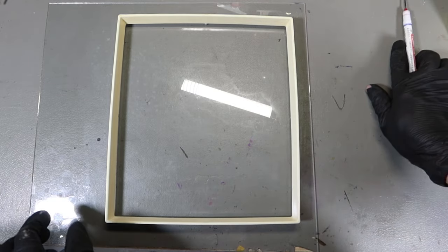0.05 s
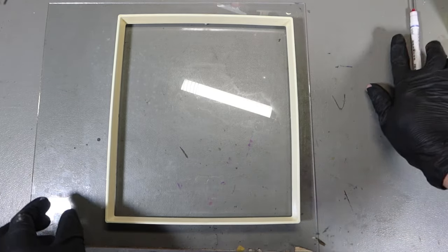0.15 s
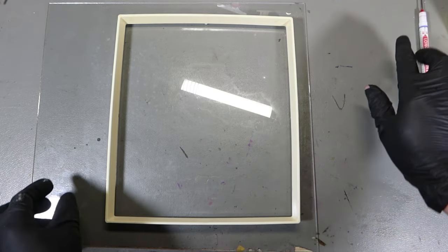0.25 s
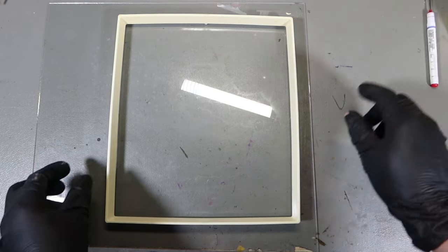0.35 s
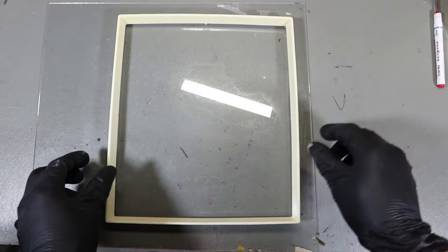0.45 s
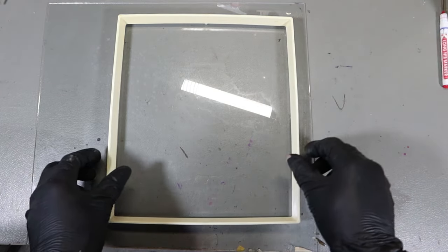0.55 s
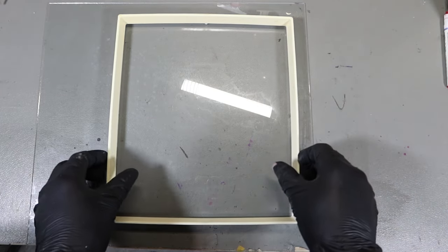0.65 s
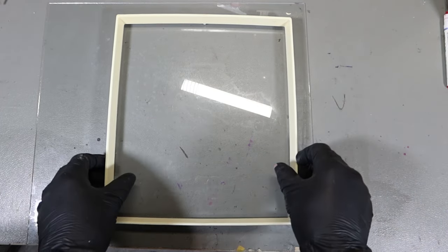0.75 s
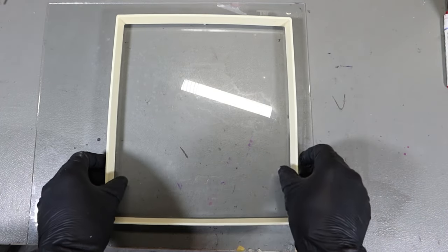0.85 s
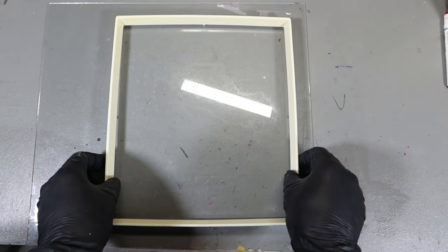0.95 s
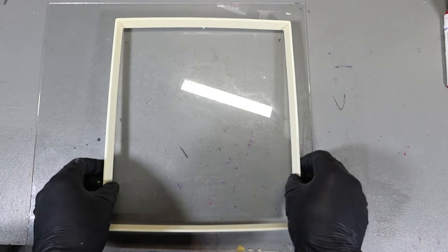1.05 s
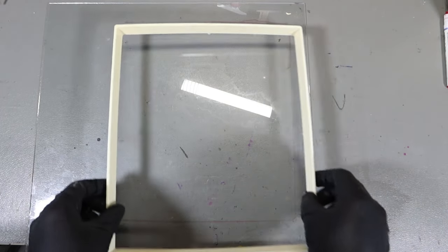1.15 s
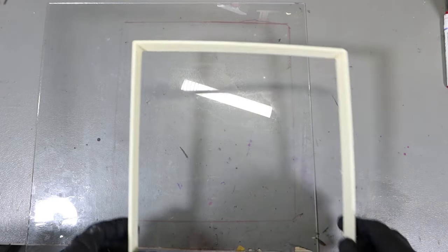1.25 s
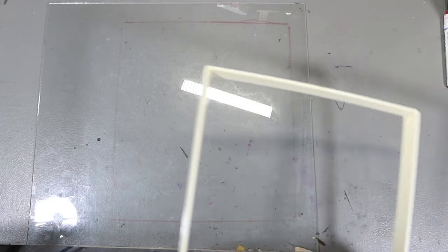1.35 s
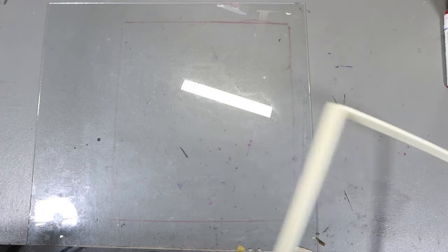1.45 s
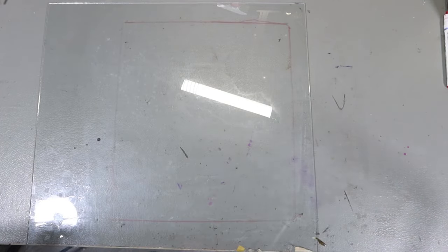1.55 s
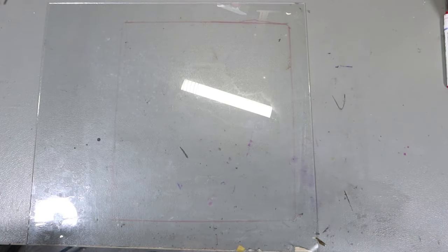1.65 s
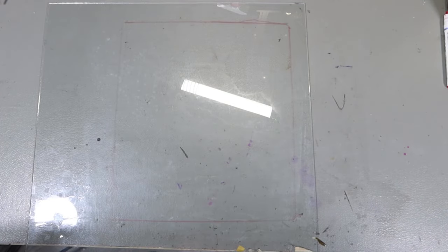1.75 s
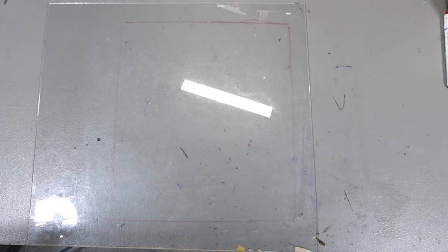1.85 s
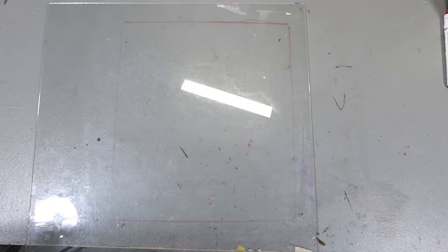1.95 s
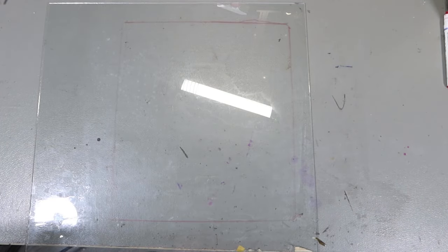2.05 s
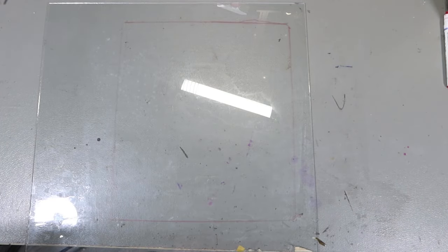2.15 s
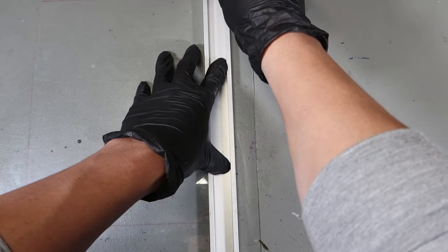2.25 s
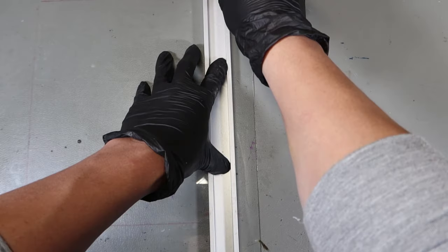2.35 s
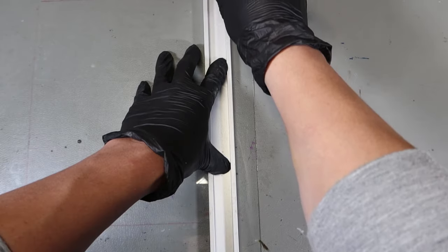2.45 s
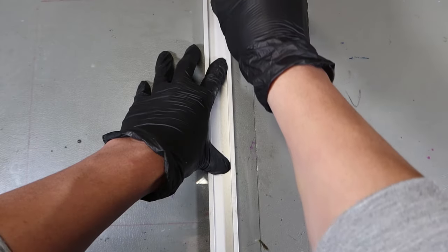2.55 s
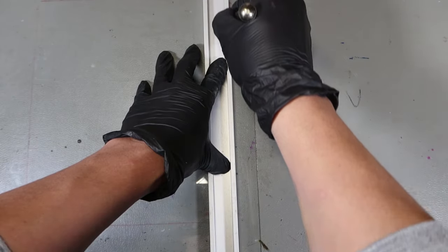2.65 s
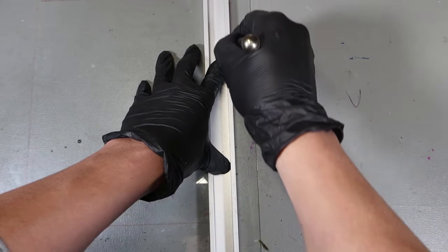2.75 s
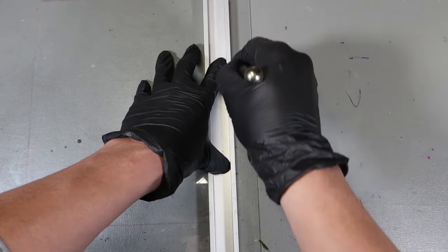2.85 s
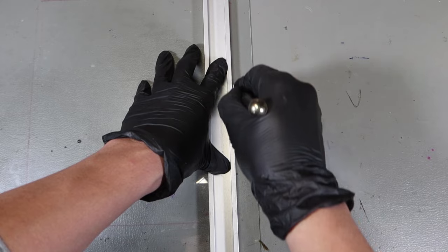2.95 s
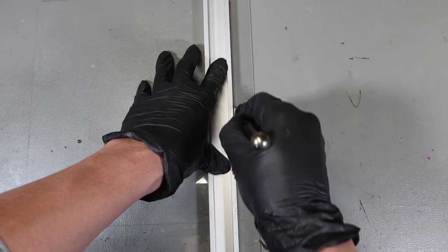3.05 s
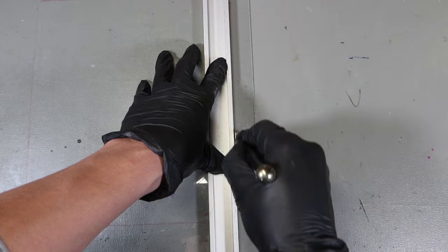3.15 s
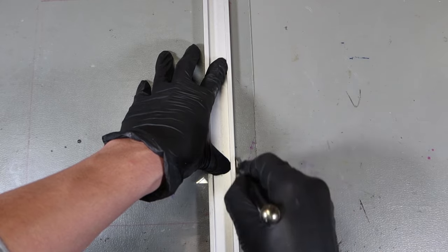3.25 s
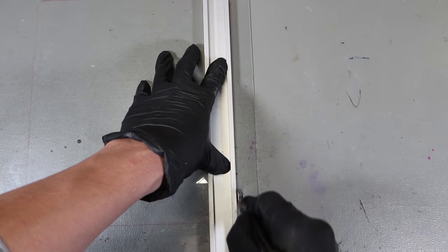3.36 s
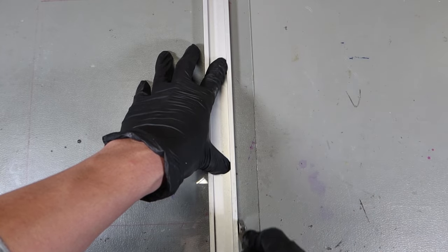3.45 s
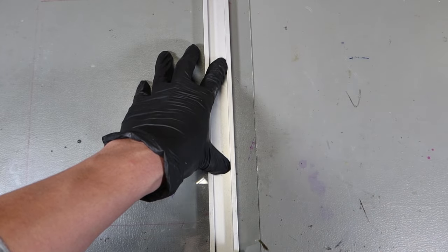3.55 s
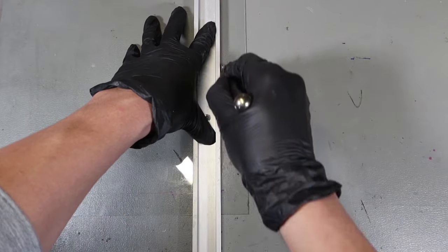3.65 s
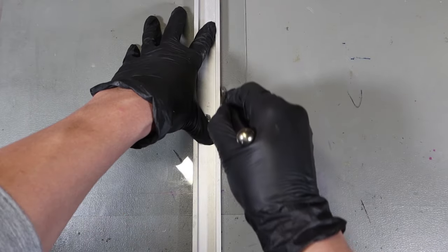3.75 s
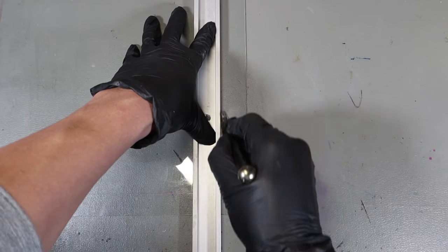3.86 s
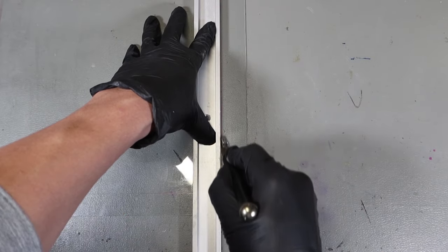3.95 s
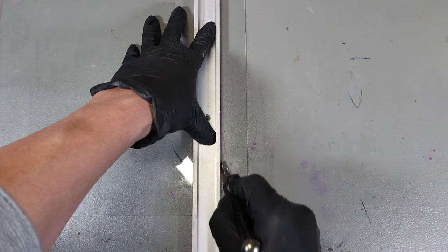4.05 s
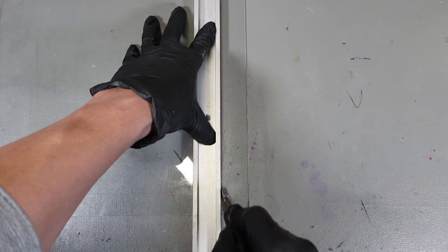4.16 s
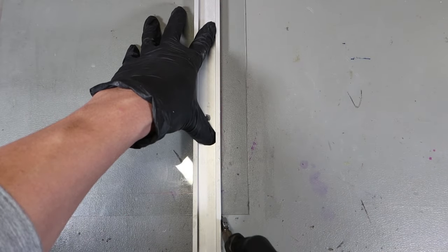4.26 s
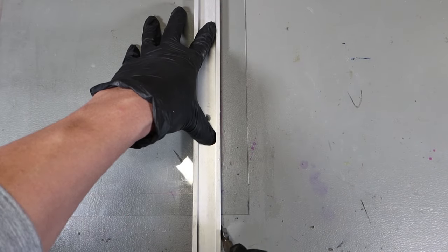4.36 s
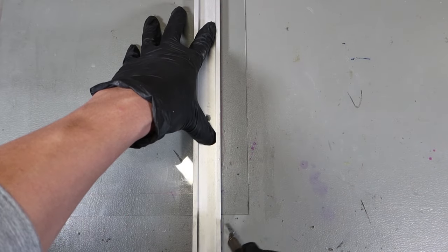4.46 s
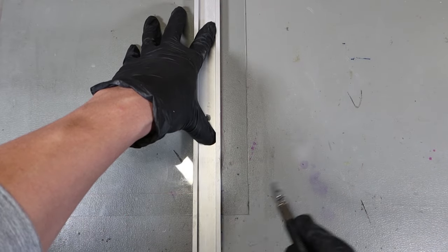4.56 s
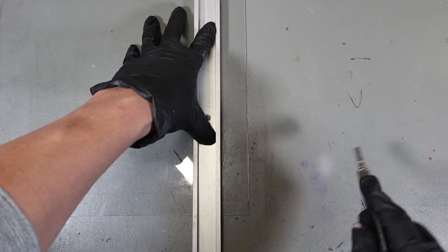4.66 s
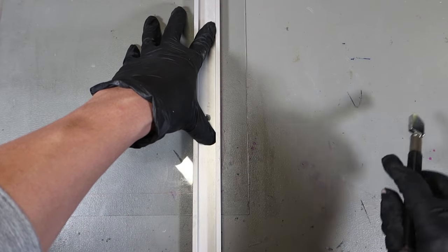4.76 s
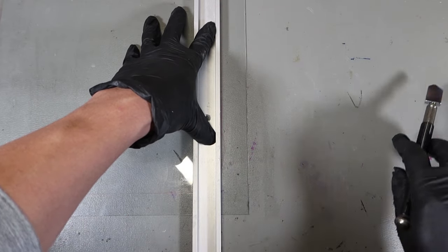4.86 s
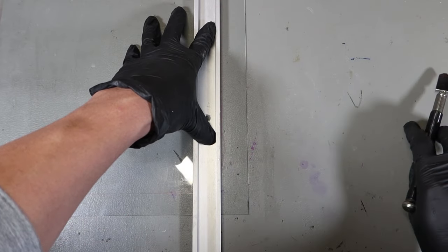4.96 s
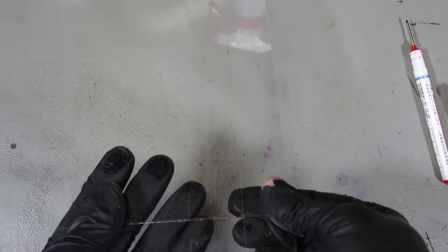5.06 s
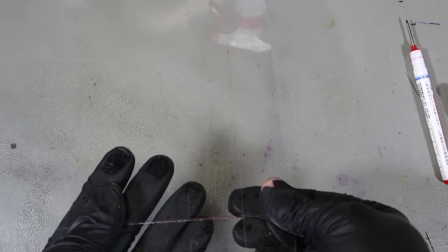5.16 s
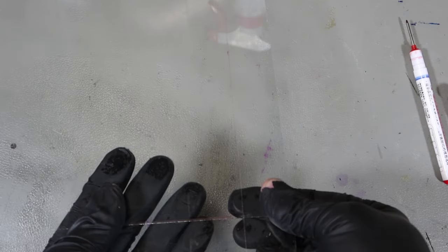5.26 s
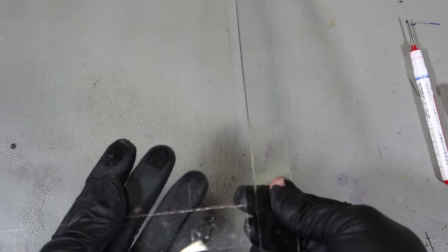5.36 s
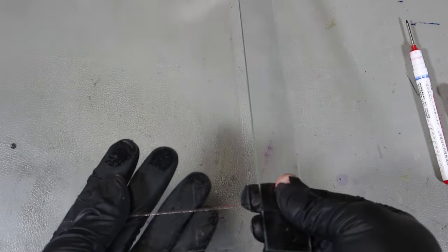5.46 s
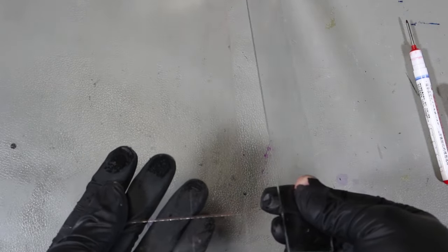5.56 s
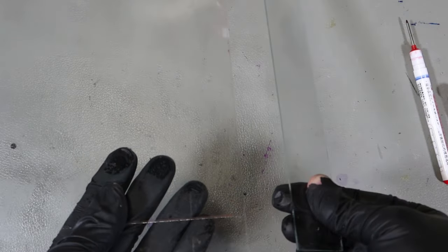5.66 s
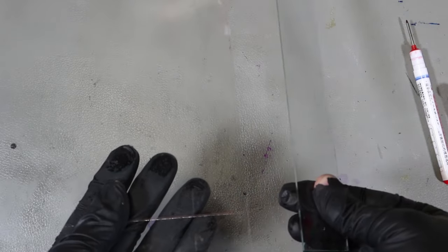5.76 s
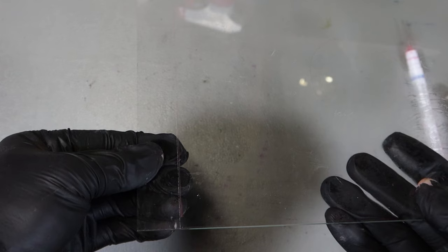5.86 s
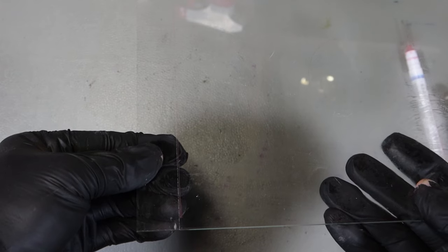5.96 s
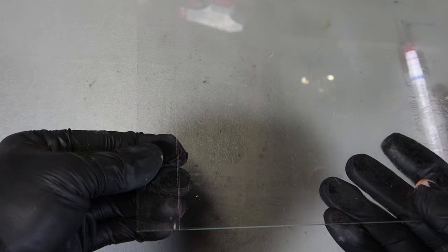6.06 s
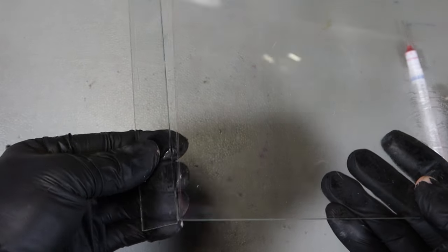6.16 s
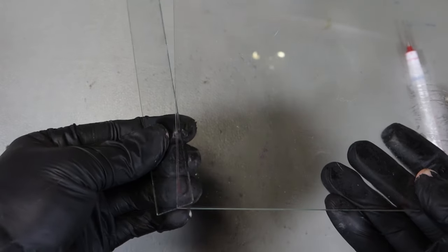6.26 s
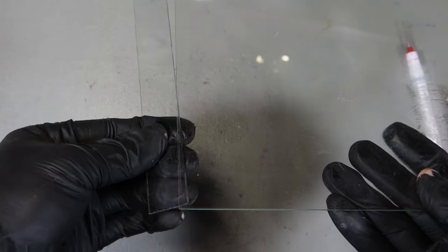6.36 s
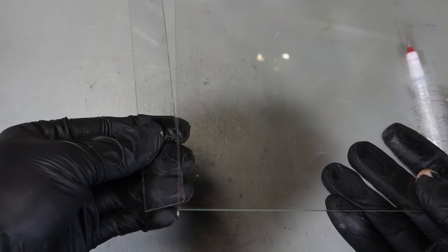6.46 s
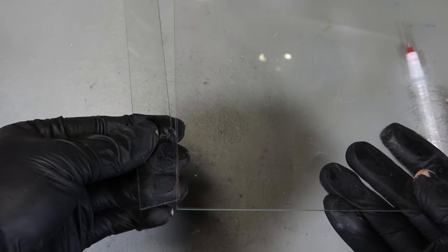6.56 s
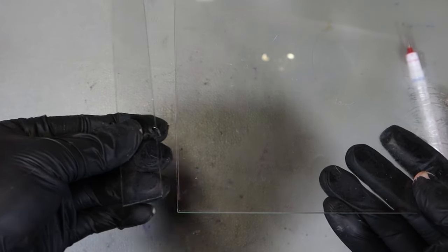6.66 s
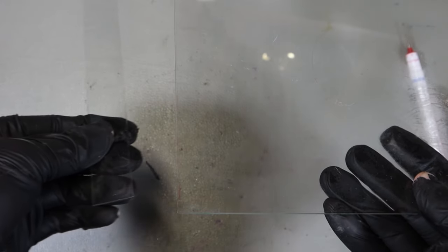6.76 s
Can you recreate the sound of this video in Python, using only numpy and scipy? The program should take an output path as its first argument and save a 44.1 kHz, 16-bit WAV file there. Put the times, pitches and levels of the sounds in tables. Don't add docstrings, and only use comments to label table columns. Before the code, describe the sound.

A plastic frame clatters off glass, a cutter wheel rasps two strokes and thuds onto the bench, then two sharp glass snaps rattle.

```python
import sys
import numpy as np
from scipy import signal
from scipy.fft import rfft, irfft
from scipy.io import wavfile
from scipy.ndimage import uniform_filter1d

SR = 44100
rng = np.random.default_rng(int(sys.argv[2]) if len(sys.argv) > 2 else 0)


def volts_from_db(level):
    exponent = np.asarray(level, float) / 20
    return 10 ** exponent


def to_wav(sig):
    pcm = np.clip(np.atleast_2d(sig), -1, 1) * 32767
    pcm = np.round(pcm).astype(np.int16)
    wavfile.write(sys.argv[1], SR, pcm.T)


N = 299880

# time_s, rasp_db, hiss_db (fracture hiss above the rasp)
SCORE = [
    (2.36, -76.5, -26),
    (2.52, -60.5, -6.5),
    (2.78, -50, -4.5),
    (3.08, -52, -4),
    (3.399, -51.5, -2.5),
    (3.58, -52.5, -1.5),
    (3.8, -52.5, 0),
    (4.05, -52, -2.5),
    (4.349, -48.5, -5),
]
# (hz, db, t60_s)
GRIP = ([(590, -43), (1000, -13), (1540, -13.5), (3800, -7), (4620, -10.5), (6940, -1.5), (11600, -1.5),
         (14800, -9), (16000, -26)], [(7200, 5.5, 0.014), (11240, -3.5, .012)])
# (hz, db, t60_s)
SHEET_TWO = ([(120, -53), (200, -24), (519, -7.5), (722, -11), (883, -6), (1650, -11.5), (2420, -8.5),
              (2750, -11.5), (3310, -11.5), (9400, -8), (16000, -21.5)], [(526, -3.5, .27), (883, -3, .12),
              (1825, -6, .17), (2470, -9, .12), (3343, -1, .12), (4005, -9, .2), (4371, -7, .2),
              (5254, -9, .19), (5852, -12, .22), (6519, -14, .25), (7391, -15, .25), (8118, -15, .25),
              (9130, -11, .15), (10980, -18, .2)])


def level(x, db):
    return x * volts_from_db(db) / np.sqrt(np.mean(x ** 2))


def response(spectrum, size=1024):
    hz, db = np.transpose(spectrum)
    grid_hz = np.linspace(1, SR / 2, size // 2 + 1)
    cep = irfft(np.log(volts_from_db(np.interp(np.log(grid_hz), np.log(hz), db))))
    cep[1:size // 2] *= 2
    cep[size // 2 + 1:] = 0
    return irfft(np.exp(rfft(cep)))


def band(x, hz, width_hz):
    return signal.lfilter(*signal.iirpeak(hz, hz / width_hz, SR), x)


def lowpass(x, hz):
    return signal.sosfiltfilt(signal.butter(2, hz, fs=SR, output="sos"), x)


def walk(rate_hz):
    k = int(SR / rate_hz)
    steps = np.repeat(rng.standard_normal(N // k + 1), k)
    return 0.99 * uniform_filter1d(uniform_filter1d(steps, k), k)[:N]


def belly_gain(t, at_s, db, spread_s):
    return volts_from_db(db) * np.exp(-((t - at_s) / spread_s) ** 2)


def room(x):
    # hz, t60_s
    decay = [(250, 0.64), (2500, 0.34), (7000, 0.32), (14000, 0.06)]
    tail_db, gap_s, onset_s = -17, .003, 0.0019
    t = np.arange(SR // 2) / SR
    tail = sum(band(rng.standard_normal(len(t)), hz, hz) * volts_from_db(-60 * t / t60_s) for hz, t60_s in decay)
    tail *= np.clip((t - gap_s) / onset_s, 0, 1)
    return x + volts_from_db(tail_db) * signal.fftconvolve(x, tail / np.sqrt(np.sum(tail ** 2)))[:N]


def knocks(hits, body, ring_db, spot_db, rise_ms, fade_ms=30, run_ms=0, swarm_db=-60, swarm_ms=200):
    out, t = np.zeros(N), np.arange(9000) / SR
    spectrum, body_modes = body
    colour = response(spectrum)
    for start_s, peak_db, treble_db, spot_hz, *own_ms in hits:
        hold_ms = max(own_ms[0] if own_ms else fade_ms, 2)
        fade = volts_from_db(-60000 * np.clip(t - run_ms / 1000, 0, None) / hold_ms)
        slip = rng.standard_normal(len(t)) * (1 - np.exp(-1000 * t / rise_ms))
        burst = slip * fade
        swarm = slip * volts_from_db(swarm_db - 60000 * t / swarm_ms)
        spot = volts_from_db(spot_db) * band(burst, spot_hz, 0.12 * spot_hz)
        crack = signal.fftconvolve(burst + swarm + spot, colour)[:len(t)]
        modes = np.zeros(len(t))
        for hz, db, t60_s in body_modes:
            split_hz = hz * (1 + 0.0044 * rng.standard_normal(3))
            modes += volts_from_db(db - 60 * t / t60_s) * np.sin(2 * np.pi * np.outer(split_hz, t)).sum(axis=0)
        ring = modes * (1 - np.exp(-400 * t / rise_ms))
        blow = crack / np.abs(crack).max() + volts_from_db(ring_db) * ring / np.abs(ring).max()
        low = lowpass(blow, 4600)
        blow -= (1 - volts_from_db(-350 * t)) * 0.96 * (blow - lowpass(blow, 9000))
        treble = blow - low
        blow = low / np.abs(low).max() + volts_from_db(treble_db) * treble / np.abs(treble).max()
        i = int(start_s * SR)
        out[i:i + len(t)] += (volts_from_db(peak_db) * blow)[:N - i]
    return room(out)


def shop():
    # hz, db_per_hz
    air_colour = [(12, -46.5), (20, -7.5), (69, -9), (91, -1), (111, -0.5), (128, -11.5), (169, -18),
                  (314, -13.5), (551, -14.5), (1510, -21), (2510, -24), (15200, -30), (16500, -56)]
    # start_s, end_s, pitch_hz, level_db
    hums = [(0.207, 0.747, 168, -69.5), (1.302, 2.3, 169, -75), (3.35, 3.69, 148, -67),
            (4.75, 5.098, 147.5, -69), (5.01, 5.11, 554, -70)]
    t = np.arange(N) / SR
    air = signal.fftconvolve(rng.standard_normal(N), response(air_colour, size=8192))[:N]
    out = level(air * volts_from_db(0.2 * walk(1.2)), -64.5)
    for start_s, end_s, hz, db in hums:
        gate = np.interp(t, [start_s - .04, start_s, end_s, end_s + 0.013], [0, 1, 1, 0])
        out += gate * level(band(rng.standard_normal(N), hz, 6.0), db)
    return out


def pressure():
    s, rasp_db, hiss_db = np.transpose(SCORE)
    t = np.arange(N) / SR
    on = np.interp(t, [s[0] - .1, s[0], s[-1] + .006, s[-1] + .014], [0, 1, 1, 0])
    return on * volts_from_db(np.interp(t, s, rasp_db)), volts_from_db(np.interp(t, s, hiss_db))


def bench():
    # start_s, pitch_hz, level_db, held_s
    pushes = [(0.021, 91, -55.5, 0.097), (0.771, 108.5, -53, 0.022), (0.774, 90.7, -43.5, 0.12),
              (1.01, 106.6, -49.5, 0.11), (1.018, 92, -52, 0.031), (1.12, 92, -45, 0.11),
              (2.51, 88.7, -55, 0.043), (2.612, 90, -51.5, 0.11), (2.77, 103.4, -46.5, .1),
              (3.249, 89.8, -49.5, 0.034), (3.64, 108.5, -47, 0.024), (3.64, 92, -46, 0.11),
              (3.95, 94, -48, 0.037), (3.961, 109.5, -51, 0.089), (4.128, 110.2, -49.5, 0.07),
              (4.3632, 85, -26.5, 0.03), (4.3867, 105.3, -37, 0.09), (4.44, 91.7, -34, 0.018),
              (4.53, 105.7, -44.5, 0.05), (4.659, 104.3, -51, 0.22), (5.408, 89, -40, 0.14),
              (5.41, 111, -43, 0.094), (5.608, 109, -44, 0.065), (5.801, 103, -54, 0.045),
              (5.948, 93.4, -55, 0.054), (6.231, 108, -44.5, 0.022), (6.25, 90.3, -37.5, 0.086),
              (6.421, 95, -41.5, 0.085), (6.7, 87.7, -63.5, .1)]
    rise_share, sag_db_per_s, release_db_per_s = 0.12, 14, 151
    wheel_shake_db, idle_shake_db = -8, -71.5
    u = np.arange(SR // 2) / SR
    modes, push = np.zeros(N), np.zeros(N)
    for start_s, hz, db, held_s in pushes:
        i = int(start_s * SR)
        fall_db = sag_db_per_s * u + release_db_per_s * np.clip(u - held_s, 0, None)
        shape = np.minimum(u / (rise_share * held_s), 1) * volts_from_db(db - fall_db)
        modes[i:i + len(u)] += (np.sqrt(2) * shape * np.sin(2 * np.pi * hz * u))[:N - i]
        push[i:i + len(u)] += shape[:N - i]
    rasp, _ = pressure()
    shake = volts_from_db(wheel_shake_db) * rasp + volts_from_db(idle_shake_db)
    tremble = sum(level(band(rng.standard_normal(N), hz, 2.3), db) for hz, db in ((90.5, 0), (108, -1)))
    rumble = band(band(rng.standard_normal(N), 76, 65), 76, 65)
    return modes + shake * tremble + (push + shake) * level(rumble, -13.0)


def marker():
    # start_s, peak_db, treble_db, spot_hz, fade_ms
    clicks = [
        (0.193, -26.5, -4, 3060, 23.5),
        (0.2, -37, -15, 2000, 91.5),
        (0.213, -41.5, -25, 1400, 24.84),
    ]
    # (hz, db, t60_s)
    barrel = ([(150, -53), (250, 2), (2910, 5.5), (7060, -11.5), (14400, -45), (16000, -47)],
               [(500, 0, 0.017)])
    return knocks(clicks, barrel, ring_db=-28, spot_db=-9, rise_ms=0.13)


def plastic_frame():
    # start_s, peak_db (under 4.6 kHz), treble_db (above that), spot_hz
    clatter = [(0.136, -46.5, -2, 3920), (0.769, -24, -11.5, 1750), (0.776, -33.5, -12, 4450),
               (0.783, -36, -25, 1900), (0.788, -27, -16, 1900), (0.801, -32, -24, 1820),
               (0.814, -38, -15, 1880), (1.006, -32.5, -13, 1770), (1.013, -35, -9.5, 3100),
               (1.107, -30, -17, 975), (1.128, -40, -36, 2700), (1.132, -44, -30, 980)]
    # (hz, db, t60_s)
    plastic = ([(120, -69), (200, -2.5), (401, -17), (986, -3), (1120, -4.5), (1910, -8), (2290, 0.5),
                (6880, -13.5), (16000, -39)], [(975, -10, 0.062), (1750, 5, 0.021), (2595, -6, .03),
                (2977, -6, .04), (3515, -5, .034), (4450, -14, .03), (5432, -14, .03)])
    return knocks(clatter, plastic, ring_db=-7.5, spot_db=11.0, rise_ms=0.092, fade_ms=24,
                  swarm_db=-20, swarm_ms=150)


def soft_touches():
    # start_s, peak_db, treble_db, spot_hz
    touches = [
        (0.185, -37.5, -23, 520),
        (0.734, -48, -9, 1000),
        (0.753, -51, -27, 440),
        (5.458, -32.5, -30, 305),
    ]
    # (hz, db, t60_s)
    padded = ([(150, -29), (350, -4), (1100, 0), (3500, -21.5), (16000, -64)], [(453, 0, 0.071)])
    return knocks(touches, padded, ring_db=-18, spot_db=13.5, rise_ms=0.63, fade_ms=76)


def rubs_and_bumps():
    # start_s, peak_db, treble_db, spot_hz, fade_ms
    rubs = [(.05, -65, -14, 3800, 300), (.893, -58, -20, 2100, 200), (.917, -56, -12, 2950, 90),
            (1.32, -66.5, 6, 6100, 150), (2.07, -64, 1, 6000, 900), (2.148, -48, -12, 4340, 30.2),
            (2.469, -48, 0, 3380, 131), (2.525, -48, 1.5, 3100, 129), (2.561, -53, 1, 3300, 130),
            (2.579, -46, -1, 9700, 133), (2.642, -46, -9, 3430, 100), (2.735, -46, 2, 9800, 100),
            (6.204, -56.5, 4.5, 7670, 69.4)]
    return knocks(rubs, GRIP, ring_db=-24.5, spot_db=9.5, rise_ms=3)


def grip_ticks():
    # start_s, peak_db, treble_db, spot_hz
    ticks = [(5.9426, -48.5, 10, 7170), (5.9514, -46.5, 10, 6630), (5.9644, -51, 12.4, 11100),
             (6.028, -62, 12, 11000), (6.0375, -40.5, 10.7, 7100), (6.0575, -56, 12, 10500),
             (6.0615, -45.5, 9.4, 11050), (6.4858, -54, 11.7, 9500), (6.6122, -60.5, 6.7, 5890),
             (6.7703, -59.5, 5.1, 8270)]
    return knocks(ticks, GRIP, ring_db=-14.0, spot_db=-8.0, rise_ms=0.5, fade_ms=62)


def landing():
    # hz, db, t60_s
    panel = [(285, 0, 0.085), (325, -1, 0.075), (150, -7, 0.05), (420, -12, 0.07), (660, -18, 0.05)]
    start_s, peak_db, push_ms = 4.3637, -12, 6
    t = np.clip(np.arange(N) / SR - start_s, 0, None)
    modes = sum((-1) ** k * volts_from_db(db - 60 * t / t60_s) * np.sin(2 * np.pi * hz * t)
                for k, (hz, db, t60_s) in enumerate(panel))
    thump = -modes * (1 - np.exp(-1000 * t / push_ms))
    return volts_from_db(peak_db) * thump / np.abs(thump).max()


def tool_drop():
    # start_s, peak_db, treble_db, spot_hz, fade_ms
    strikes = [
        (3.64, -57, -6, 2900, 16),
        (4.3595, -32.5, -11, 3040, 79),
        (4.3645, -18, 0, 6700, 24),
        (4.372, -30.5, -32, 1530, 180),
    ]
    # start_s, peak_db, treble_db, spot_hz, fade_ms
    bounces = [
        (4.436, -47, 6, 2300, 25),
        (4.4715, -62, 14, 8000, 9),
        (4.511, -48, -3, 3580, 22),
        (4.531, -42.5, -8.5, 1900, 90),
        (4.539, -44, -2.5, 2500, 42),
    ]
    # (hz, db, t60_s)
    metal = ([(350, -17.5), (600, 2.5), (1280, -7.5), (6030, -2.5), (6730, 0), (8390, -1.5), (9620, 0),
              (14300, -3), (16000, -36)], [(5400, -8, .03), (6724, -3, .09), (8166, -6, .05),
              (10020, -10, .15), (14060, 3, .1)])
    # (hz, db, t60_s)
    handle = ([(470, -54), (800, -9), (1920, -5), (2410, -7.5), (6170, -22), (10500, -22), (16000, -40)],
               [(1900, 0, 0.047), (6720, -20, 0.15), (8500, -24, .05)])
    return (knocks(strikes, metal, ring_db=-20, spot_db=-13, rise_ms=0.5, swarm_db=-26, swarm_ms=190)
            + knocks(bounces, handle, ring_db=-6.5, spot_db=6, rise_ms=0.65))


def first_snap():
    # start_s, peak_db, treble_db, spot_hz
    cracks = [
        (5.407, -6.5, 5.5, 6300),
        (5.432, -23, -2, 2970),
        (5.459, -33, 0, 900),
    ]
    # start_s, peak_db, treble_db, spot_hz
    set_down = [
        (5.5975, -19.5, -18, 1200),
        (5.611, -29, -20, 636),
    ]
    # start_s, peak_db, treble_db, spot_hz
    rattle = [
        (5.578, -48, 2, 6370),
        (5.607, -47.5, 8, 9040),
        (5.621, -38.5, 10, 7260),
        (5.633, -37.5, 6.9, 7460),
        (5.645, -43, 11.2, 7200),
        (5.657, -42.5, 10, 7570),
        (5.674, -42, 5.8, 8300),
        (5.735, -61, 8, 10500),
    ]
    # (hz, db, t60_s)
    sheet = ([(120, -67.5), (200, -25.5), (409, -2.5), (1140, -8.5), (1450, -8), (1870, -8.5), (2960, -7),
              (3250, -10.5), (5420, -14), (6170, -9), (16000, -24.5)], [(310, -10.5, .14), (646, 0, .11),
              (974, -5, .14), (1200, -10, .17), (1480, -8, .15), (2150, -6, .08), (2939, -5, .19),
              (3887, -10, .15), (4673, -17, .28), (5717, -18, .25), (6035, -16, .17), (6756, -18, .2),
              (8102, -18, .22), (9125, -18, .2)])
    # (hz, db, t60_s)
    bench_sheet = ([(150, -40), (300, -8), (1100, -6), (3000, -9), (6500, -14), (16000, -40)],
                    [(635, 0, .13), (1260, 0, .04), (1588, -12, .2), (2035, -12, .18), (2815, -8, .24),
                    (3957, -16, .2)])
    # (hz, db, t60_s)
    strip = ([(590, -11), (1000, 7), (2620, 1), (2910, 2), (6180, -9), (7190, -5.5), (10800, -10.5),
              (12100, -12), (16000, -22)], [(209, -4.5, .38), (705, -12, .57), (2815, -8, .19),
              (4081, -14, .2), (4720, -13, .3), (5367, -6, .1), (6966, -7, .15), (7289, -6, .07),
              (8134, -9, .08), (9179, -6, .08), (11700, -11, .05), (12320, -8, .08), (13180, -12, .06),
              (14700, -12, .05)])
    return (knocks(cracks, sheet, ring_db=-11, spot_db=-4, rise_ms=0.9, fade_ms=32, run_ms=6,
                   swarm_db=-15, swarm_ms=230)
            + knocks(set_down, bench_sheet, ring_db=-12, spot_db=-4, rise_ms=0.7, fade_ms=60,
                     swarm_db=-22, swarm_ms=250)
            + knocks(rattle, strip, ring_db=-4.5, spot_db=-1, rise_ms=0.34, fade_ms=40,
                     swarm_db=-14, swarm_ms=180))


def second_snap():
    # start_s, peak_db, treble_db, spot_hz, fade_ms (some)
    cracks = [
        (6.231, -16, -6, 1500, 20),
        (6.2318, -8, 8.5, 8200),
        (6.269, -24, 0, 520),
        (6.297, -33, -1, 560),
    ]
    # start_s, peak_db, treble_db, spot_hz
    fall = [
        (6.335, -15, 5.5, 6900),
        (6.351, -26, -8, 7160),
        (6.369, -28, 1, 7170),
        (6.389, -31.5, 8.5, 10200),
        (6.398, -36.5, 10, 9800),
        (6.41, -37.5, 13, 7120),
    ]
    # (hz, db, t60_s)
    loose_strip = (SHEET_TWO[0], [(1066, -7, .18), (3359, 0, .14), (3700, -6, .12), (4097, 0, .14),
                    (4538, -4, .15), (5300, -4, .1), (7000, -3, .12), (7700, -7, .12), (9500, -8, .1),
                    (10800, -9, .07), (14030, -8, .05)])
    return (knocks(cracks, SHEET_TWO, ring_db=-11, spot_db=-11.5, rise_ms=0.6, fade_ms=36, run_ms=7,
                   swarm_db=-17, swarm_ms=240)
            + knocks(fall, loose_strip, ring_db=-11, spot_db=4, rise_ms=0.885, fade_ms=45, run_ms=3,
                     swarm_db=-13, swarm_ms=200))


def chatter():
    slips_per_s, depth_db, slip_ms, settled_s = 260, 8.5, 1.9, 3
    slips = (rng.random(N) < slips_per_s / SR) * rng.random(N)
    jolt = np.minimum(signal.lfilter([1], [1, -np.exp(-1000 / slip_ms / SR)], slips), 1)
    depth = np.interp(np.arange(N) / SR, [SCORE[1][0], settled_s], [1, .6])
    return volts_from_db(depth_db * depth * (jolt - jolt.mean()))


def cutter():
    # time_s, pitch_hz, level_db, spread_s
    strong_modes = [(2.55, 1900, -10, .12), (2.58, 9600, -2, .06), (2.78, 1720, -5, .07),
                    (2.78, 3850, -2, .09), (2.8, 2620, -1, .1), (2.8, 3050, -5, .12), (2.8, 8150, 4, .06),
                    (2.83, 6100, -1, .06), (2.83, 6700, 2, .07), (2.85, 9700, 2, .13),
                    (2.88, 3680, -1, .13), (2.92, 2050, -5, .13), (2.9, 880, -9, .45),
                    (3.12, 3550, -4, .07), (3.2, 1250, -8, .45), (3.28, 1480, -4, .3), (3.28, 8200, 4, .09),
                    (3.28, 9000, 1, .06), (3.3, 2750, -3, .1), (3.35, 1950, -3, .12), (3.35, 3180, -1, .09),
                    (3.37, 3680, -3, .06), (3.37, 11900, -1, .06), (3.42, 3950, -3, .08),
                    (3.45, 2920, 0, .12), (3.54, 9900, 2, .08), (3.55, 7500, 4, .07), (3.58, 6900, 5, .08),
                    (3.68, 2900, -3, .06), (3.8, 2700, -5, .15), (3.87, 8500, 5, .09),
                    (3.87, 10200, 1, .06), (4.0, 850, -10, .35), (3.92, 1700, -9, .15), (4.0, 2920, 0, .07),
                    (4.05, 6500, 1, .09), (4.12, 3180, -3, .08), (4.14, 1920, -3, .12),
                    (4.22, 8900, 2, .09), (4.24, 3850, -3, .08), (4.25, 2850, 0, .11),
                    (4.31, 2200, -2, .09)]
    # hz, db_per_hz
    rasp_colour = [(201, -26), (291, -8), (422, -5), (624, 3.5), (1170, -8), (1940, -4.5), (3770, -4),
                   (4580, -9), (8230, -3), (12200, -9), (16000, -22.5)]
    # (time_s, level_db above the rasp, spread_s)
    drone = ((647, 72), [(2.45, -6, 0.25), (2.95, -7, 0.31), (3.75, -8, 0.18), (4.2, -9.5, 0.31)])
    # (time_s, level_db above the rasp, spread_s)
    deepest = ((287.4, 13.5), [(2.4, 4, 0.058), (2.8, -9.5, 0.38), (3.66, -15, 0.12), (4.34, -15, 0.048)])
    span = slice(int(2.2 * SR), int(4.4 * SR))
    t, out = np.arange(N)[span] / SR, np.zeros(N)
    rasp, hiss = pressure()
    happens, sign, size = rng.random((3, len(t)))
    chips = (happens < .3) * np.sign(sign - .5) * volts_from_db(-1.8 * np.log(size + .002))
    modes = sum(belly_gain(t, at_s, db, spread_s) * band(chips, hz, 0.033 * hz) / np.sqrt(hz)
                for at_s, hz, db, spread_s in strong_modes)
    crowd_hz = np.linspace(1700, 15800, 70) + rng.uniform(-100, 100, 70)
    travel, places = 2.1 * walk(8)[span], rng.integers(0, N, 70)
    crowd = np.zeros(len(t))
    for k, hz in enumerate(crowd_hz):
        swell = np.sin(np.roll(travel, places[k]) + k) ** 2
        crowd += swell * band(np.roll(chips, 400 * k), hz, 80)
    bite = level(chips, -6) + level(crowd, -3)
    coloured = signal.fftconvolve(bite, response(rasp_colour))[:len(t)]
    wobble = (volts_from_db(0.8 * walk(25.26) + 1.2 * walk(90)) * chatter())[span]
    glass = (level(coloured, -1.4) + level(modes, -9.0)) * wobble
    low = lowpass(glass, 5870)
    deep = np.zeros(len(t))
    for mode, bellies in (drone, deepest):
        gain = volts_from_db(-31) + sum(belly_gain(t, *belly) for belly in bellies)
        deep += level(band(band(chips, *mode), *mode), -4.4) * gain
    out[span] = rasp[span] * (level(low, 0.3) + level(glass - low, 1.0) * hiss[span] + deep)
    return out


def scene():
    blows = (plastic_frame() + soft_touches() + marker() + tool_drop() + first_snap()
             + grip_ticks() + rubs_and_bumps() + second_snap())
    blows -= lowpass(blows, 110)
    return (blows + cutter() + landing() + bench() + shop())[None]


def top_cut(x):
    return signal.sosfilt(signal.butter(12, 16640, fs=SR, output="sos"), x)


def record(dry):
    top = signal.ellip(8, .3, 70, 16200, fs=SR, output="sos")
    rounded = 1.74 * np.tanh(dry / 1.854)
    return top_cut(signal.sosfilt(top, rounded))


dry = scene()
out = record(dry)
to_wav(out)
```